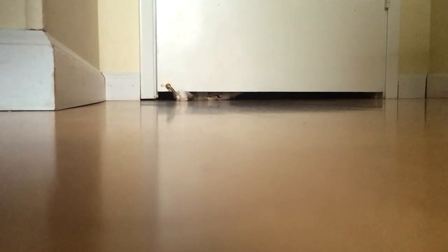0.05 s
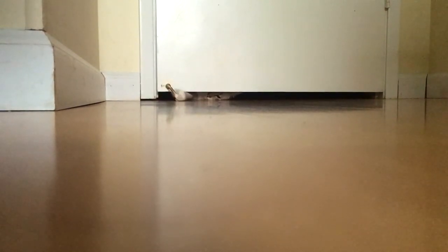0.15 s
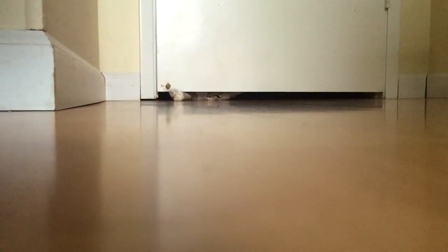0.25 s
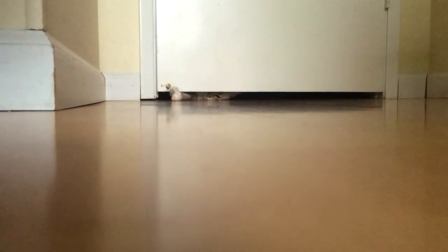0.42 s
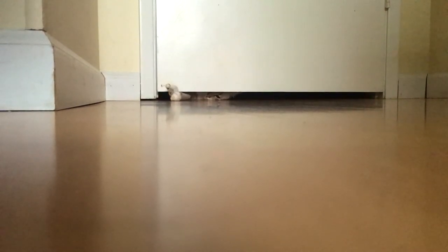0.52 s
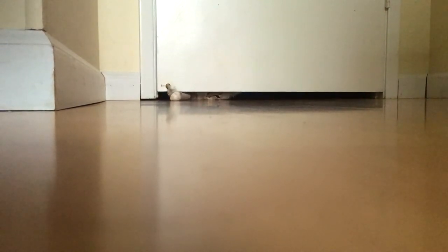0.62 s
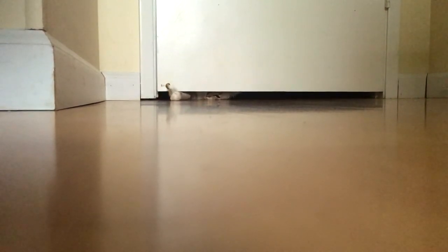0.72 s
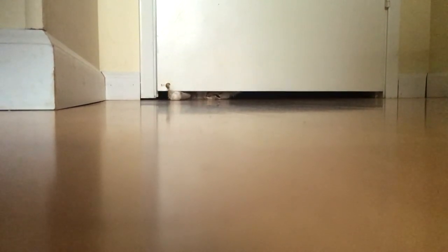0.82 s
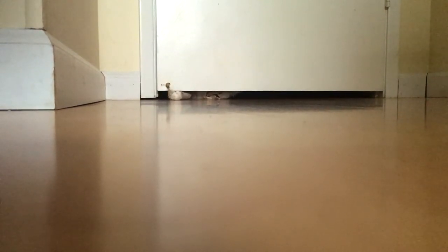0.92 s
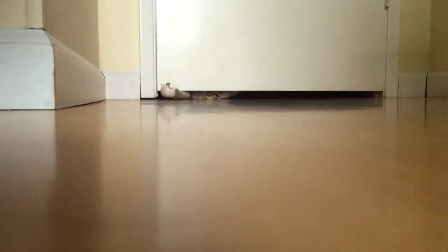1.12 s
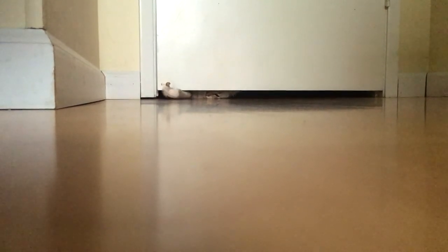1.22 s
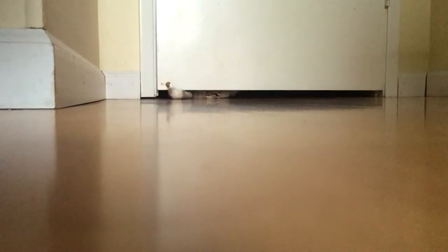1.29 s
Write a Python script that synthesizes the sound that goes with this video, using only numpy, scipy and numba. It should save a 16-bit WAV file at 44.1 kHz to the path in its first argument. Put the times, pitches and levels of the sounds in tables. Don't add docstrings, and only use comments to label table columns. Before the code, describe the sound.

Quiet room rumble and faint hiss, then at about 0.19 s a claw scrape and tick as a spring door stopper is let go. From 0.2 s it twangs in a fluttering metallic rattle, with sharp knocks and low booms from the hollow door. Uneven clacks quicken, soften and dull, fading by about 1.0 s in a short bare-room echo. Tiny soft touches follow around 1.12 and 1.19 s.

```python
import sys
import numpy as np
from scipy import signal
from scipy.fft import rfft, irfft
from scipy.io import wavfile
from scipy.ndimage import uniform_filter1d
from numba import njit

SR = 44100
rng = np.random.default_rng(int(sys.argv[2]) if len(sys.argv) > 2 else 0)


def volts_from_decibels(level):
    exponent = np.asarray(level, float) / 20
    return 10 ** exponent


def output_pcm(signal):
    pcm = np.clip(np.atleast_2d(signal).T, -1, 1) * 32767
    wavfile.write(sys.argv[1], SR, np.round(pcm).astype(np.int16))


N = 59535
RELEASE_S, SWINGS = 0.204, 22


def band(x, hz, width_hz):
    return signal.lfilter(*signal.iirpeak(hz, hz / width_hz, SR), x)


def ring(x, modes):
    out = 0
    for hz, db, t60 in modes:
        pole = np.exp((2j * np.pi * hz - np.log(1000) / t60) / SR)
        out = out + volts_from_decibels(db) * signal.lfilter([1], [1, -pole], x).imag
    return out


def fade(x, t60):
    return signal.lfilter([1], [1, -np.exp(-np.log(1000) / t60 / SR)], x)


def spikes(times, gain):
    return np.bincount((times * SR).astype(int), gain, N)[:N]


# frequency in Hz, level in dB per Hz.
AIR_SPECTRUM = [(20, -14), (40, 1), (170, -7), (363, -10.5), (754, -19.5), (2100, -31), (5500, -43.5),
                (16000, -39.5)]


def air():
    hz = np.arange(N // 2 + 1) * SR / N + 1
    table_hz, table_db = np.array(AIR_SPECTRUM).T
    shape_db = np.interp(np.log(hz), np.log(table_hz), table_db)
    noise = irfft(rfft(rng.standard_normal(N)) * volts_from_decibels(shape_db), N)
    level_db = -59.5
    return noise * volts_from_decibels(level_db) / noise.std()


# start in seconds, level in dB, centre in Hz, width in Hz, t60 in seconds.
TOUCHES = [
    (0.188, -48.5, 830, 1390, 1),
    (0.192, -69, 3000, 3000, 0.23),
    (.1942, -55.5, 13400, 8850, 0.0056),
    (0.1975, -42, 2700, 2530, 0.023),
    (1.1185, -70, 2400, 1930, .06),
    (1.193, -67.5, 4600, 900, 0.061),
    (1.192, -66.5, 5900, 1010, 0.034),
    (1.192, -69, 2800, 1500, 0.095),
    (1.19, -76.5, 12100, 9000, .05),
]


def touches():
    out = 0
    for start, db, hz, width_hz, t60 in TOUCHES:
        envelope = fade(spikes(np.array([start]), volts_from_decibels([db + 10])), t60)
        scratch = envelope * rng.standard_normal(N)
        out = out + band(band(scratch, hz, width_hz), hz, width_hz)
    return out


# time in seconds, rate in swings per second.
SWING_RATE = [(.205, 15.89), (.29, 17.37), (.42, 18.78), (.55, 20.66), (.64, 24.02), (.73, 25.27),
              (.81, 29.35), (1., 30.97)]
# time in seconds, share (0-1) of the swing at which the far-side clack falls.
OFF_CENTRE = [(.2, .48), (.29, .46), (.46, .46), (.51, .49), (.56, .56), (.6, .52), (.645, .45), (.9, .46)]


def clack_times():
    t = np.arange(N) / SR
    rate = np.interp(t, *np.array(SWING_RATE).T) * (t > RELEASE_S)
    turns = np.cumsum(rate) / SR
    near = np.interp(np.arange(SWINGS) + 1e-9, turns, t)
    step = np.append(np.diff(near), near[-1] - near[-2])
    far = near + step * np.interp(near + step / 2, *np.array(OFF_CENTRE).T)
    return np.ravel([near, far], "F"), np.tile([0, 1], SWINGS)


# time in seconds, coil clack in dB, knock on the panel in dB, push on the door in dB.
STRENGTH = [(0.198, -33, -23.5, -28), (0.258, -36.5, -22.5, -23), (.295, -36, -27, -55),
            (0.332, -42, -38.5, -27.5), (.4, -44, -44, -28.5), (.52, -42, -43, -25.5),
            (0.638, -47.5, -43, -27.5), (0.712, -46.5, -43, -41), (0.761, -51.5, -49.5, -38),
            (.84, -57, -54.5, -40.5), (0.929, -64, -63, -44), (1.1, -109, -97, -50.5)]
# time in seconds, extra coil dB, extra panel
# dB.
ACCENTS = [(.2347, 3, 1), (.323, 2, .1), (.4332, 4, -2), (.4567, 2, .3), (.5081, 4, 6), (.5335, 2.5, 2.5),
           (.582, -2, 1), (.4841, -1, 14), (.5605, 10, 1), (.6855, 4, 1), (.7245, -4, 0), (.7995, 7, 0),
           (.835, 10, 0)]


def clack_levels(times, far):
    at, *levels = np.array(STRENGTH).T
    coil_db, knock_db, push_db = (np.interp(times, at, db) for db in levels)
    far_coil_db, far_push_db, scatter_db = 1, -2.5, 0.25
    coil_db = coil_db + far_coil_db * far + scatter_db * rng.standard_normal(len(times))
    push_db = push_db + far_push_db * far
    accent_db = 0
    for time, coil, panel in ACCENTS:
        hit = np.arange(len(times)) == np.argmin(abs(times - time))
        accent_db = accent_db + coil * hit
        knock_db = knock_db + panel * hit
    return coil_db, accent_db, knock_db, push_db


def coil_grit():
    clicks_per_s, scatter_db = 9000, 0.5
    luck = rng.random((3, N))
    click = (luck[0] < clicks_per_s / SR) * np.sign(luck[1] - 0.5)
    grit = click * volts_from_decibels(-scatter_db * np.log(luck[2] + 1e-9))
    return grit / np.sqrt(uniform_filter1d(grit ** 2, size=220) + 0.1)


def chatter(times, db, t60, grit):
    rise = int(0.0011 * SR) + 1
    envelope = fade(spikes(times, volts_from_decibels(db)), t60)
    return uniform_filter1d(envelope, rise, origin=(rise - 1) // 2) * grit


def dulling(times):
    return 5.5 * (times - RELEASE_S)


# frequency in Hz, width in Hz, level in dB.
SPRING = [(954, 244, -5), (1127, 162, 3), (1238, 185, 1), (1936, 325, -5), (2340, 590, -6.5),
          (2720, 338, -3.5), (3520, 460, -12), (4450, 390, -14.5), (5920, 910, -16.5), (6880, 790, -17),
          (9000, 740, -16), (11450, 360, -16), (14000, 4300, -24)]


def spring_coils(times, coil_db, accent_db, grit):
    t60, colour_spread_db, accent_full_hz, dull_hz = 0.067, 1.5, 2640, 4480
    colour_db = colour_spread_db * rng.standard_normal((len(SPRING), len(times)))
    out = 0
    for k, (hz, width_hz, db) in enumerate(SPRING):
        extra_db = accent_db * min(hz / accent_full_hz, 1)
        lost_db = dulling(times) * np.log2(hz / 1000)
        clack = chatter(times, coil_db + colour_db[k] + extra_db - lost_db, t60, grit)
        out = out + (-1) ** k * volts_from_decibels(db + 14) * band(clack, hz, width_hz)
    return signal.sosfilt(signal.butter(1, dull_hz, fs=SR, output="sos"), out)


# frequency in Hz, level in dB, t60 in seconds.
PANEL = [(177, -1.5, 0.16), (207, -17, 0.033), (264, -3.5, 0.32), (332.3, 1, 0.064), (357, -3.5, 0.047),
         (427, -4.5, 0.1), (518.5, -7, 0.11), (647.3, -1.5, 0.083), (695.8, -0.5, 0.099),
         (752, -5.5, 0.044), (854, -5, 0.12), (954, -7, 0.024), (1032.4, -4, 0.12), (1200.6, -6.5, 0.15)]


def door_panel(times, knock_db, grit):
    t60, edge_db = 0.032, 16.5
    knock = chatter(times, knock_db, t60, grit) + spikes(times, volts_from_decibels(knock_db + edge_db))
    return volts_from_decibels(-36.5) * ring(knock, PANEL)


# frequency in Hz, level in dB, t60 in seconds.
DOOR = [(36.6, -7, 0.34), (74.7, -9.5, 0.42), (89.7, 3, 0.35), (175.5, -2, 0.1), (195, -4.5, 0.24),
        (208.4, -36, 0.11), (252.5, -8, 0.41), (316.4, -17, 0.57)]


def hollow_door(times, push_db):
    bump = np.hanning(int(0.003 * SR) + 2)
    push = np.convolve(spikes(times, volts_from_decibels(push_db)), bump / bump.sum())[:N]
    return volts_from_decibels(-14.5) * ring(push, DOOR)


def spring_cap(times, coil_db, grit):
    lag_s, level_db, t60 = 0.0105, -12, 0.03
    rattle = chatter(times + lag_s, coil_db + level_db - 2 * dulling(times), t60, grit)
    return band(rattle, 8840, 450)


def stopper():
    times, far = clack_times()
    coil_db, accent_db, knock_db, push_db = clack_levels(times, far)
    grit = coil_grit()
    rattle = spring_coils(times, coil_db, accent_db, grit) + spring_cap(times, coil_db, grit)
    return rattle + door_panel(times, knock_db, grit), hollow_door(times, push_db)


@njit
def walls(x, lags, gain, damp):
    line, soft, out = np.zeros((8, 4096)), np.zeros(8), np.zeros(len(x))
    for i in range(len(x)):
        total = 0.
        for k in range(8):
            soft[k] += (1 - damp) * (gain[k] * line[k, (i - lags[k]) & 4095] - soft[k])
            total += soft[k]
            out[i] += soft[k] * (1 - 2 * (k % 2))
        for k in range(8):
            line[k, i & 4095] = x[i] + soft[k] - total / 4
    return out


def bare_room(x):
    t60, damp, level_db = 0.38, 0.64, -6
    lags = rng.integers(700, 2600, size=8)
    gain = volts_from_decibels(-60 * lags / SR / t60)
    return volts_from_decibels(level_db) * walls(x + 1e-18, lags, gain, damp)


def scene():
    rattle, door = stopper()
    near = rattle + touches()
    return (near + bare_room(near) + door + air())[None]


def top_cut(x):
    return signal.sosfilt(signal.butter(12, 16520, fs=SR, output="sos"), x)


def record(dry):
    mic_low_hz = 30.6
    heard = signal.sosfilt(signal.butter(4, mic_low_hz, "high", fs=SR, output="sos"), dry)
    return top_cut(heard)


dry = scene()
out = record(dry)
output_pcm(out)
```